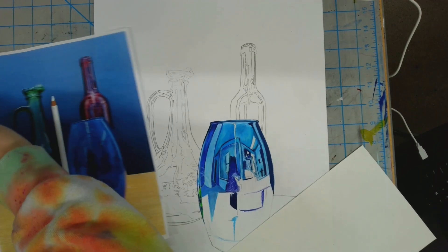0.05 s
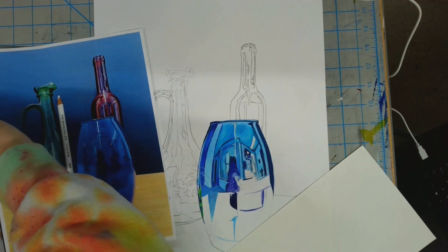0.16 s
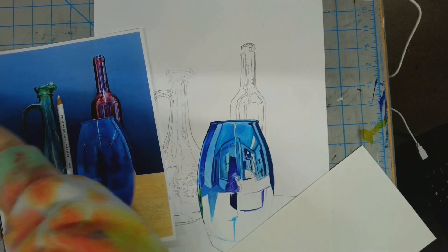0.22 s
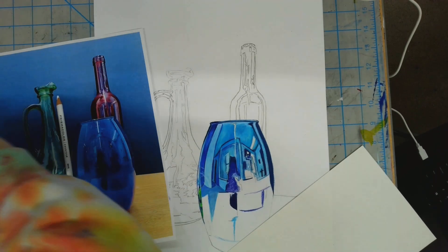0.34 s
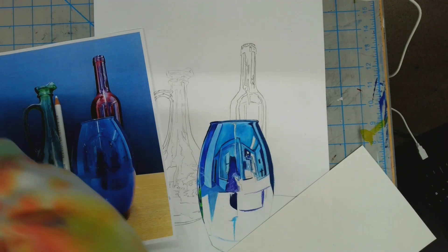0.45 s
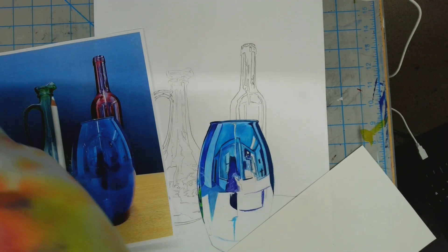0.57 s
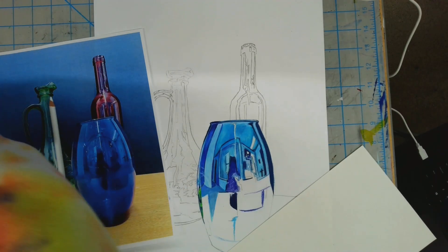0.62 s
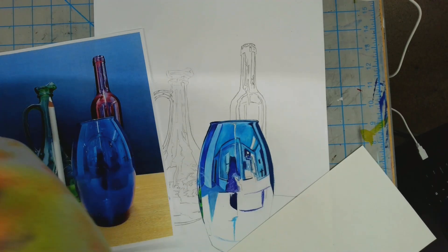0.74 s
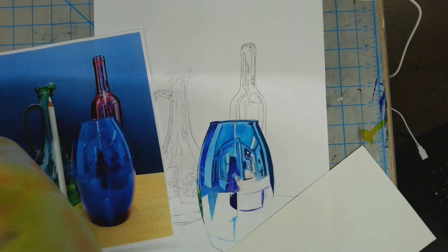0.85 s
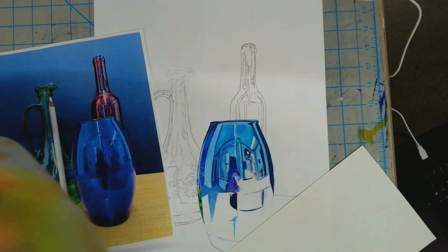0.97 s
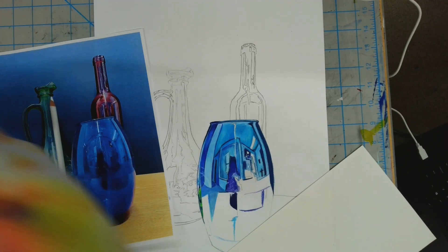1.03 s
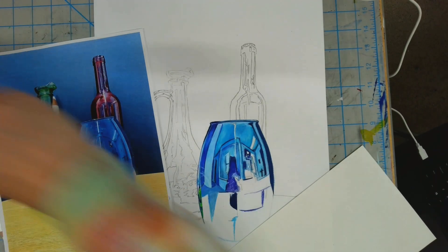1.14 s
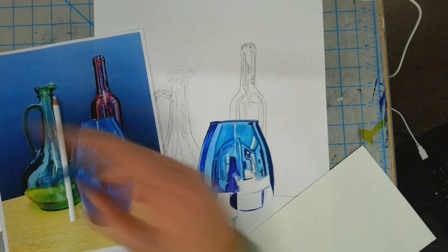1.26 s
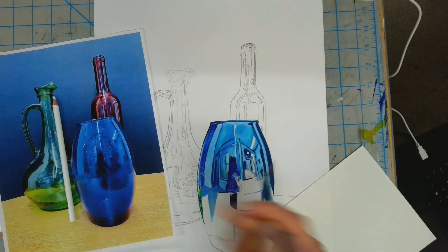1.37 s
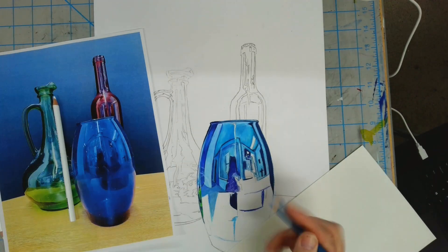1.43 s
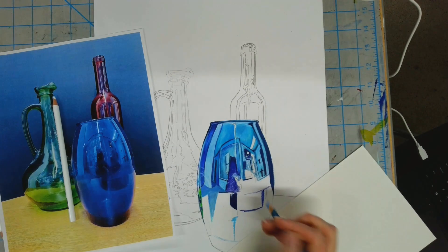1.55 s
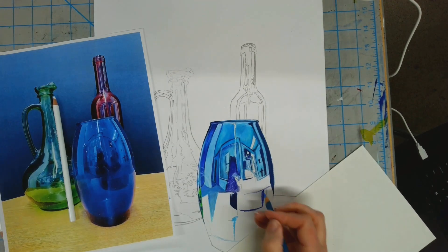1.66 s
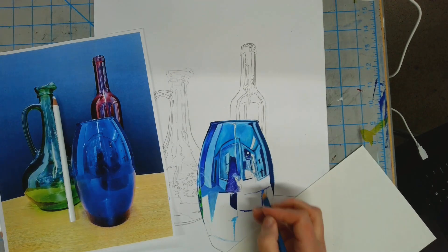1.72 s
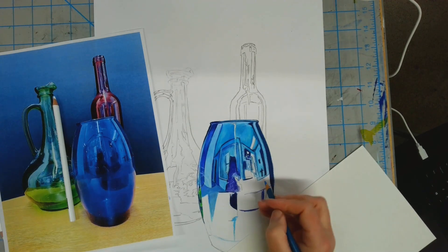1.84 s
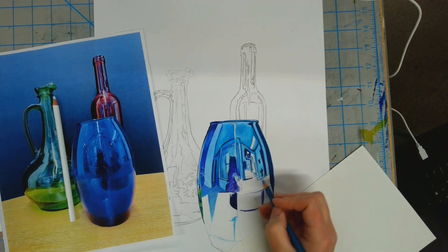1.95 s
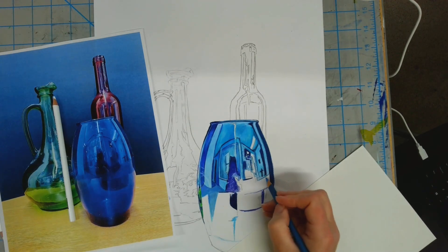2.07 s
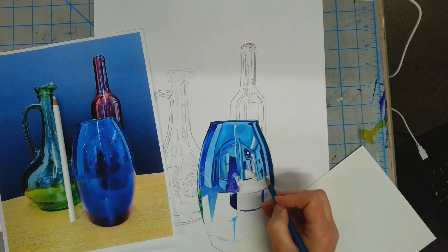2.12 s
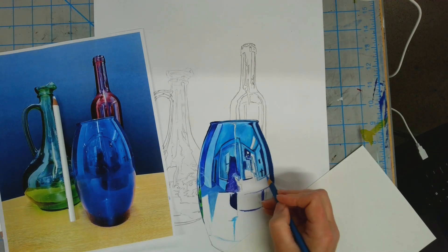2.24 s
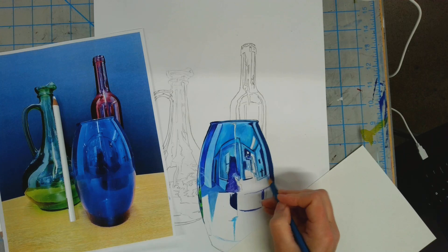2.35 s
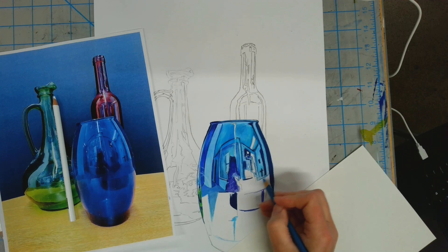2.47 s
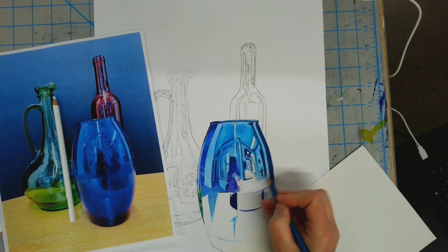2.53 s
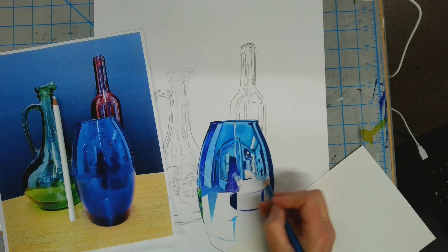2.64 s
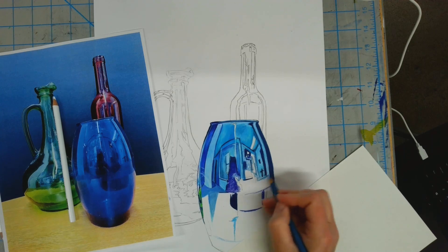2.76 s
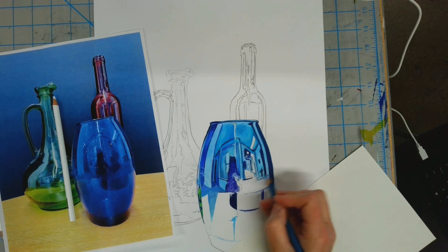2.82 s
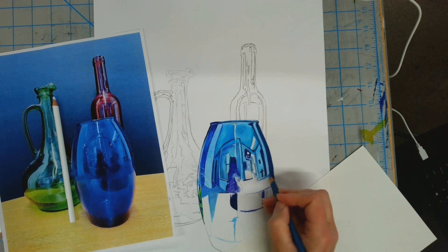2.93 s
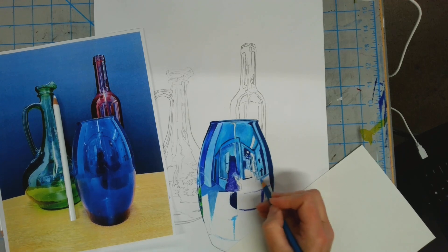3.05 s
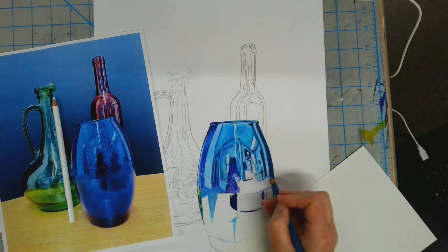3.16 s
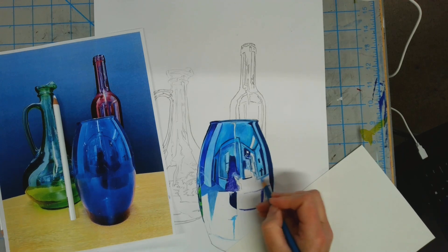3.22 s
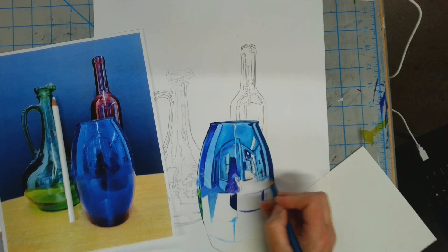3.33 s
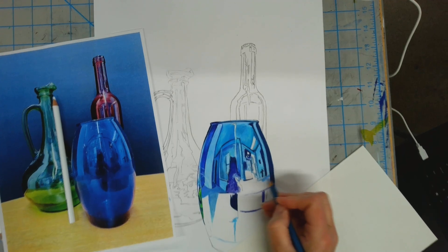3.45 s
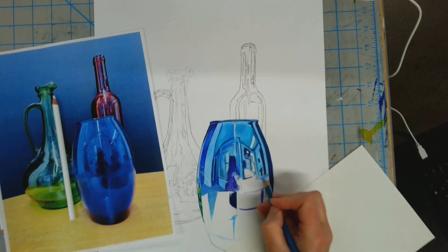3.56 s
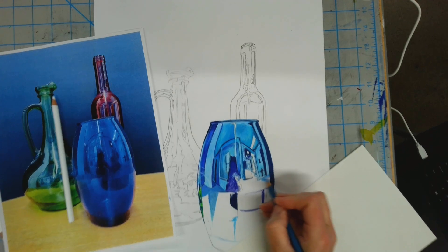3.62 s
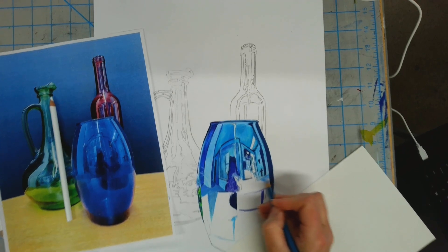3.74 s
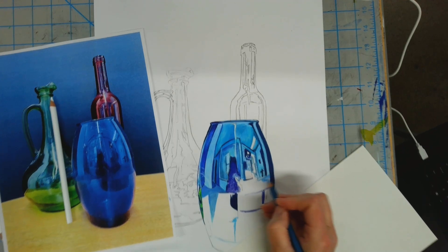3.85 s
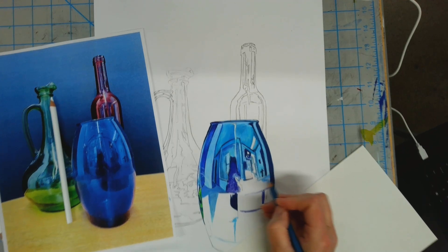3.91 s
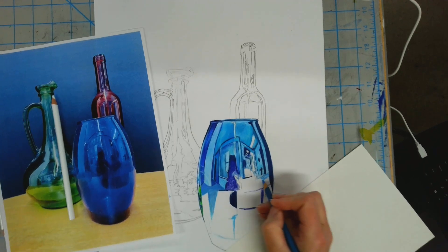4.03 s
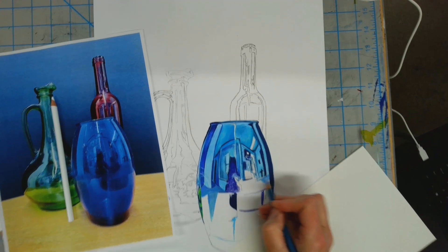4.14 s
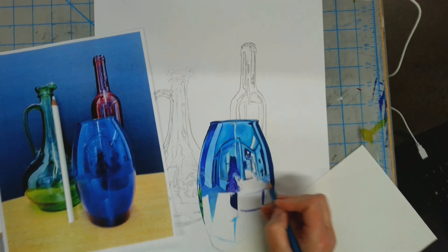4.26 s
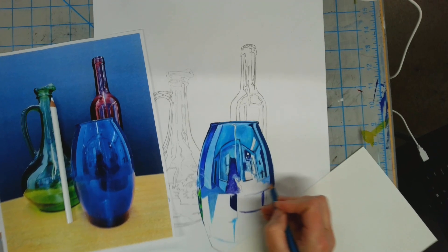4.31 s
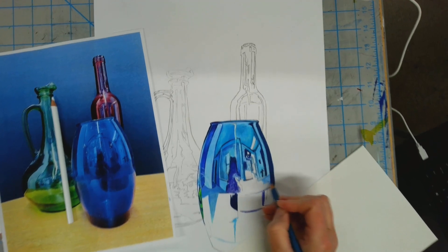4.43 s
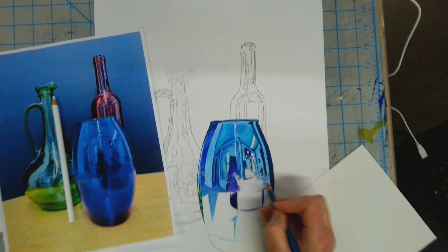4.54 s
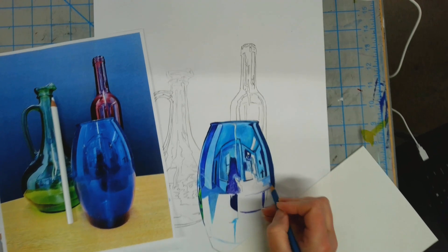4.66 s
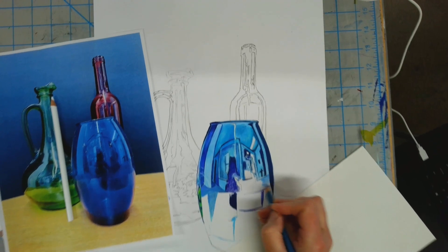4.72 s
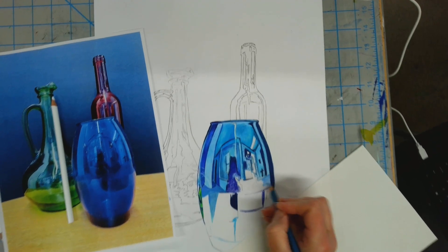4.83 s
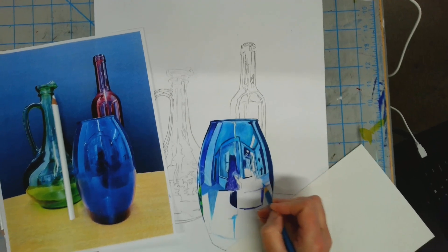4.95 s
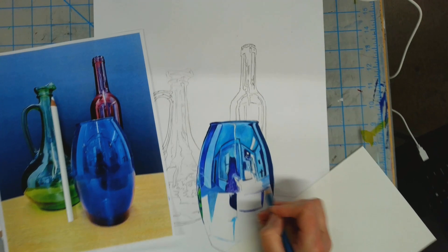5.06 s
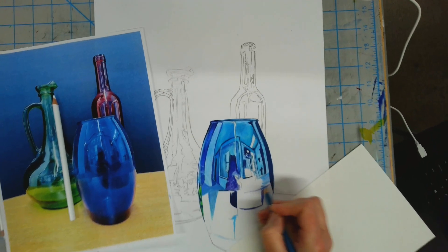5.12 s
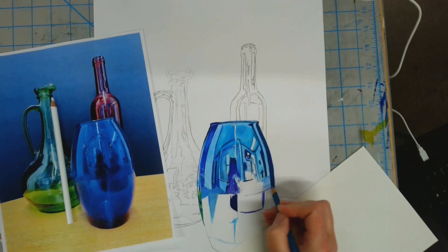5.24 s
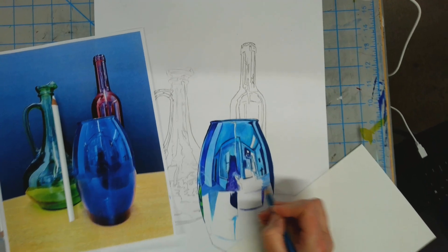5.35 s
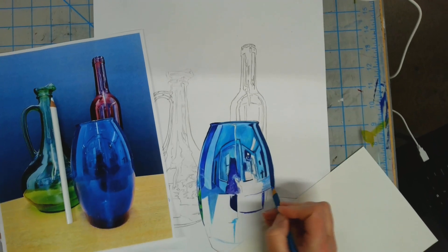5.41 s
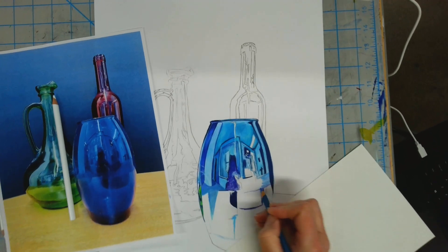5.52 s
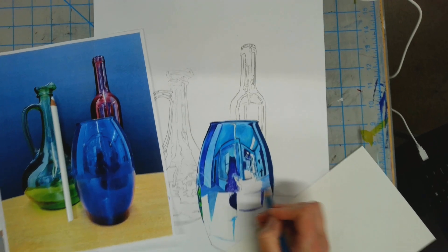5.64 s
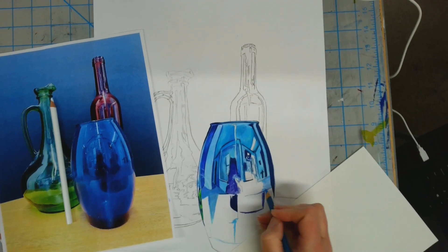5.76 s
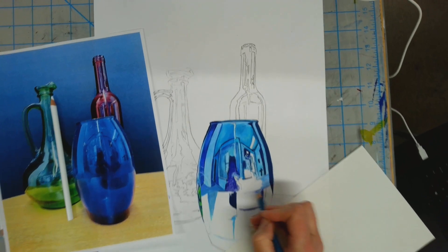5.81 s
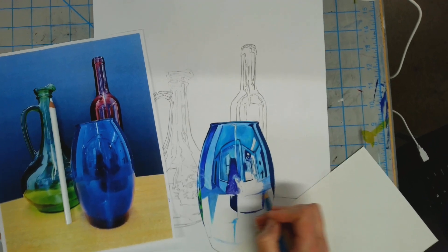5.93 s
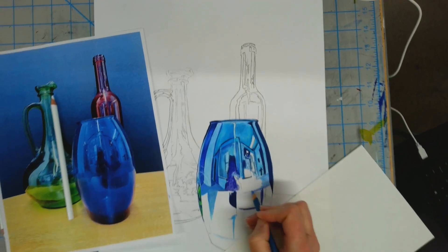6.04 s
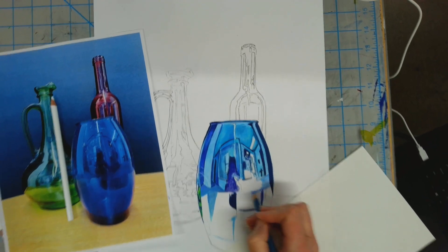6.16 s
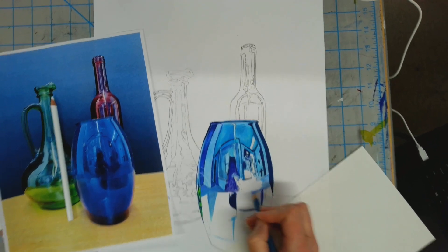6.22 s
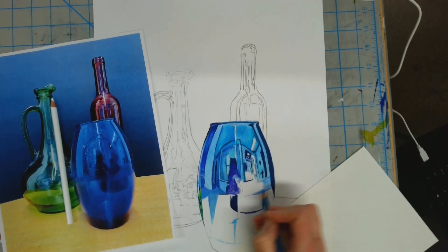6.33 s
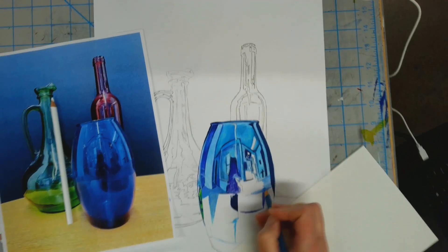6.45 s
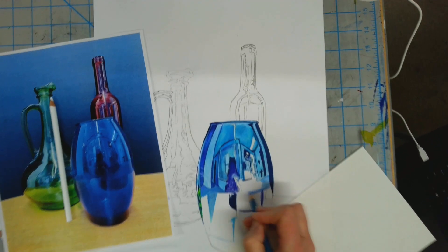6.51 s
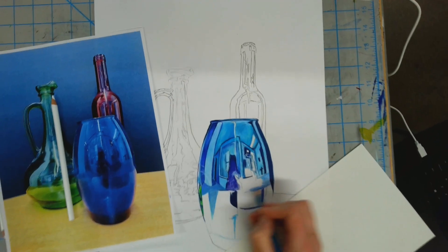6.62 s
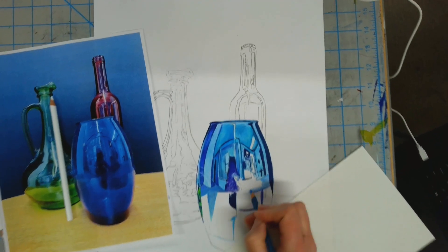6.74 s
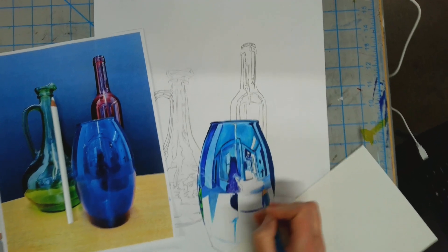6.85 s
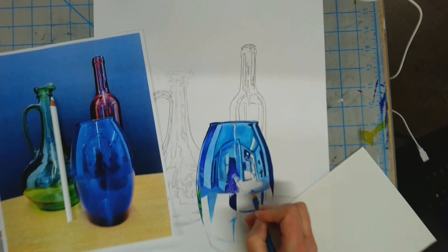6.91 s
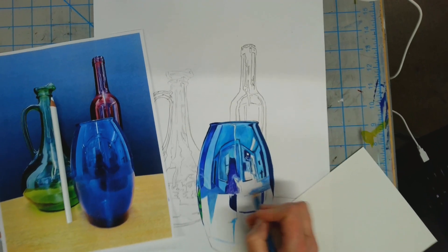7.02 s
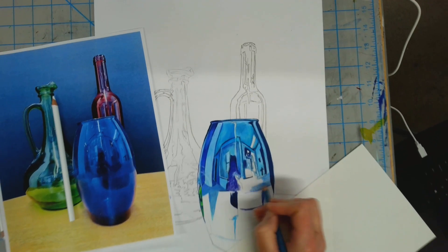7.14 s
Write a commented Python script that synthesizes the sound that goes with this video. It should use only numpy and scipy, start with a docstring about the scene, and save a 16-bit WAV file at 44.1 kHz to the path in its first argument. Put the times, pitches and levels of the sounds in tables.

```python
"""A sheet hisses across a desk, close to the microphone, and a pencil clicks down, rolls and rattles.
Sleeve and hand rub the paper, then a coloured pencil shades to and fro, about eleven strokes a second.
Friction is filtered trains of fibre slips; clicks are decaying modes and noise. The tip and the sheet
hiss most near 7 kHz, at the microphone's presence peak. The quiet room rumbles, echoes each contact
and, further off, lets through one faint knock."""
import sys
import numpy as np
from scipy import signal
from scipy.fft import rfft, irfft
from scipy.io import wavfile
from scipy.ndimage import uniform_filter1d

SR = 44100
rng = np.random.default_rng(int(sys.argv[2]) if len(sys.argv) > 2 else 0)


def wav_record(signal):
    """Record a signal, one row per channel, as 16-bit PCM in the file named by sys.argv[1]."""
    frames = np.transpose(np.atleast_2d(signal))
    bounded = np.clip(frames, -1, 1)
    # unit amplitude maps onto the largest positive 16-bit level
    quanta = np.round(bounded * 32767).astype(np.int16)
    wavfile.write(sys.argv[1], SR, quanta)


N = 316638
TIME = np.arange(N) / SR  # t/s

# Spectra of the place: columns [f/Hz, relative level/dB]
# low rumble, steady room air, thin microphone hiss
RUMBLE_SPECTRUM = [(20, -51), (40, -48.5), (60, -24), (90, -11.5), (125, -0.5), (160, 0.5), (183, 0.5),
                   (215, -2.5), (250, -6.5), (400, -19), (900, -51.5)]
AIR_SPECTRUM = [(60, -36.5), (200, -1.5), (330, 2), (500, -3.5), (700, -9.5), (880, -10.5), (1100, -17),
                (2000, -23), (4000, -28.5), (6000, -30.5), (10000, -52.5)]
MIC_HISS_SPECTRUM = [(2000, -9), (4500, -5.5), (6000, 5), (7000, 11.5), (7700, 2), (8500, 0), (9000, -0.5),
                     (10500, -57)]
# reverberant tail of the room, knock further off
REVERB_SPECTRUM = [(150, -28), (500, 12.5), (1200, 4.5), (3000, -1.5), (4500, -5.5), (7000, -7),
                   (10000, -4)]
FAR_KNOCK_SPECTRUM = [(400, -16), (1000, -5), (1700, -0.5), (2800, -2), (4000, -6), (6800, 1.5),
                      (9500, -18)]

# Spectra close to the microphone: columns [f/Hz, relative level/dB]
# sliding sheet, lower rasp of broad surfaces, pencil tip on paper
SHEET_SPECTRUM = [(300, -10.5), (1500, -27), (2500, -21.5), (3800, -16), (5200, -9), (5900, -7), (6900, 3),
                  (7400, 0), (8200, -9), (9200, -14), (10000, -24.5), (10800, -66)]
RASP_SPECTRUM = [(600, -5.5), (1300, -5.5), (2200, -5), (3000, 6), (3800, 6.5), (5000, 4), (6500, 2.5),
                 (10000, -32)]
TIP_SPECTRUM = [(1000, -34), (3000, -36), (4500, -18.5), (5500, -9), (6300, -6), (6900, 1), (7400, -1.5),
                (8300, -7), (9000, -17.5), (10000, -25), (10800, -58)]
# thud of the desk board, softness of wood meeting paper
THUD_SPECTRUM = [(200, -5), (450, -2.5), (750, -10.5), (1150, -1), (1550, -8), (2300, -3), (3500, -4.5),
                 (7000, -18)]
SOFT_CONTACT = [(30, -23), (200, -2.5), (500, -2), (7300, -1.5), (8500, -7), (9800, -7), (10800, -34)]

# Swells of the rumble: columns [middle t/s, length t/s, rise level/dB]
RUMBLE_SWELLS = [(.11, 0.15, 6), (0.658, 0.11, 6.5), (0.903, 0.16, 3.5), (1.218, .14, 5), (1.57, 0.13, 3),
                 (1.887, .2, 5.5), (5.663, 0.16, 3.5), (6.5, 0.27, 3.5), (6.96, 0.23, 6)]
# Slides of sheet, sleeve and hand:
# columns [fastest t/s, speeding up t/s, slowing down t/s, level/dB, rasp relative level/dB]
SLIDES = [(0.004, .05, .055, -40, -26), (.112, .13, 0.041, -39.5, -23), (.6, 0.45, 0.3, -59.5, -15),
          (1.12, 0.31, 0.39, -65.5, -11.5), (1.48, .25, 0.5, -68, -14), (1.7, .1, 0.085, -63, -5),
          (1.83, 0.14, 0.26, -52.5, -12), (2.02, .12, 0.07, -58, -10.5)]

# Pencil contacts: columns [t/s, level/dB, desk knock relative level/dB]
PENCIL_CONTACTS = [(0.2093, -44.5, -7.5), (0.444, -42.5, -2), (0.4729, -24.5, -20), (0.4769, -30, -9.5),
                   (0.5065, -30, -14), (0.5163, -13, -4), (0.533, -41, 4.5), (0.5462, -32, -7),
                   (0.5639, -29, -3.5), (0.642, -31, -26), (0.7313, -41, -21), (0.7978, -15.5, -15.5),
                   (0.8131, -22, -11), (1.07, -47, -16), (1.362, -51, -25)]
# Short rings as the pencil rocks and rolls: columns [t/s, f/Hz, level/dB, T60 t/s]
ROCKING_PINGS = [(0.5455, 3220, -31, 0.044), (.565, 3270, -40, 0.028), (0.6406, 7680, -22, 0.013),
                 (0.641, 4710, -40, 0.043), (0.732, 4790, -45, .028), (.7317, 7430, -36.5, 0.01),
                 (1.069, 7220, -37, 0.012)]
# Bending modes of the pencil, then modes of the desk: columns [f/Hz, relative level/dB, T60 t/s]
PENCIL_MODES = [(2950, -11, .008), (3800, -8, .008), (4280, -4, .008), (4660, -4, .008), (4980, -6, .008),
                (6030, -10, .008), (6620, -1, .009), (7050, 0, .008), (7380, -3, .008), (8000, -10, .007),
                (9300, -17, .005)]
DESK_MODES = [(380, -9, .035), (800, -11, .025), (1018, -7, .035), (1135, -3, .035), (1384, -5, .035),
              (1505, -2, .035), (1824, -3, .03), (2237, -4, .025), (2340, -6, .025), (2750, -3, .012),
              (3300, -4, .012), (3850, 1, .009)]

# Pace of the wrist: columns [t/s, stroke rate f/Hz]
STROKE_RATE = [(2.257, 12.05), (2.716, 10.68), (3.342, 10.96), (4.407, 10.59), (4.979, 11.11),
               (5.409, 9.78), (5.73, 11.185), (7.18, 10.99)]
# Pressure on the pencil: columns [t/s, relative level/dB]
PENCIL_PRESSURE = [(2.3, -63), (2.62, -55.5), (3.4, -53.5), (3.9, -55), (4.15, -53.5), (4.7, -54),
                   (5.1, -51.5), (5.7, -53.5), (6.0, -51.5), (6.42, -53.5), (6.72, -56.5), (7.0, -51.5),
                   (7.18, -54.5)]
# Rasp of the lead's broad side as the pencil is tilted: columns [t/s, relative level/dB]
SIDE_RASP = [(2.3, -15), (4.1, -14.5), (4.85, -16.5), (5.7, -10.5), (6.3, -11.5), (7.18, -13)]

RUMBLE_DB, RUMBLE_WAVER_DB = -52.5, 0.5
FAR_KNOCK_S = 4.402
WALL_ECHO_S = 0.0092  # delay of the nearest wall's echo
TOP_HZ = 10400  # upper limit of the recorder
SLIDE_CURVE = 1.34  # 1 = pointed swell, 2 = rounded
# the pencil rolls: start, build-up, stop, die-away and level of its rattle
ROLL_S, ROLL_ATTACK_S, ROLL_STOP_S, ROLL_T60_S, ROLL_DB = 0.473, 0.038, 0.65, 0.12, -55
SHADING_S = 2.257  # the tip touches the paper and the shading begins
# the return stroke is lighter and smoother; no two strokes are alike
RETURN_DB, RETURN_RASP_DB, STROKE_SCATTER_DB = -0.6, -3.5, 0.7
FORWARD_LEAN, RETURN_LEAN = 0.84, 0.94  # under 1: a stroke is fastest before its middle


def undb(db):
    """Decibels to gain."""
    return 10 ** (np.asarray(db) / 20)


def unit(x):
    """Scale to rms 1."""
    return x / np.sqrt(np.mean(x ** 2))


def curves(rows):
    """Join (t/s, value) rows by straight lines."""
    return np.interp(TIME, *np.transpose(rows))


def colour(x, points):
    """Filter by (f/Hz, level/dB) points joined along log frequency."""
    hz, db = np.transpose(points)
    bins = np.maximum(np.fft.rfftfreq(len(x), 1 / SR), 1)
    gain = undb(np.interp(np.log(bins), np.log(hz), db))
    return irfft(rfft(x) * gain, len(x))


def noise(points, size=N):
    """Coloured noise of rms 1."""
    return unit(colour(rng.standard_normal(size), points))


def walk(rate):
    """Smooth random wander of rms 1 with a new target rate times a second."""
    hold = max(int(SR / rate), 1)
    steps = np.repeat(rng.standard_normal(N // hold + 1), hold)
    return unit(uniform_filter1d(steps, hold)[:N])


def fade(t, t60):
    """Exponential decay, 60 dB down after t60."""
    return np.exp(-np.log(1000) * t / t60)


def add(out, s, sound):
    """Mix a sound in at time s."""
    start = max(int(s * SR), 0)
    out[start:start + len(sound)] += sound[:N - start]


def fibres(rate, spread_db):
    """Random tiny slips, rate a second; a positive spread makes a few strong, a negative one a few weak."""
    hit = rng.random(N) < rate / SR
    size = undb(spread_db * np.minimum(rng.exponential(size=N), 5))
    return hit * rng.standard_normal(N) * size


def ring(modes, t, detune, scatter_db):
    """One blow on a set of decaying modes; each blow weights and shifts them a little."""
    hz, db, t60 = np.transpose(modes)[:, :, None]
    shift, weight = rng.standard_normal((2, len(modes), 1))
    sign = (-1) ** np.arange(len(modes))[:, None]
    gain = undb(db + scatter_db * weight) * sign
    waves = np.sin(2 * np.pi * hz * (1 + detune * shift) * t) * fade(t, t60)
    return np.sum(gain * waves, axis=0) / np.sqrt(np.sum(gain ** 2))


def background(air_db=-60, hiss_db=-73):
    """A low rumble that swells and sinks, the steady air of the room and the microphone's thin hiss."""
    swell_db = sum(db * np.exp(-(2 * (TIME - s) / length) ** 2) for s, length, db in RUMBLE_SWELLS)
    rumble_db = RUMBLE_DB + swell_db + RUMBLE_WAVER_DB * walk(4.6)
    rumble = undb(rumble_db) * noise(RUMBLE_SPECTRUM)
    air = undb(air_db) * noise(AIR_SPECTRUM)
    hiss = undb(hiss_db) * noise(MIC_HISS_SPECTRUM)
    return rumble + air + hiss


def room(x, wall_db, early_db, late_db, early_t60=0.17, late_t60=0.65, gap_s=0.0037):
    """One distinct echo from the nearest wall, quick scattered reflections, then a longer tail."""
    t = TIME[:SR]
    response = np.zeros(SR)
    response[int(WALL_ECHO_S * SR)] = undb(wall_db)
    for db, t60 in (early_db, early_t60), (late_db, late_t60):
        build_up = np.clip(t / gap_s - 1, 0, 1)  # silent for gap_s, full after twice that
        tail = noise(REVERB_SPECTRUM, size=SR) * fade(t, t60) * build_up
        response = response + undb(db) * tail / np.linalg.norm(tail)
    return x + signal.fftconvolve(x, response)[:N]


def far_knock(db=-59, t60=1.0, onset_db=-1, onset_t60=0.16, rise_s=0.0053):
    """A faint knock further off: only its reverberation, as noise with a fast and a slow decay."""
    out, t = np.zeros(N), TIME[:SR]
    decay = fade(t, t60) + undb(onset_db) * fade(t, onset_t60)
    swell = 1 - np.exp(-t / rise_s)
    add(out, FAR_KNOCK_S, undb(db) * noise(FAR_KNOCK_SPECTRUM, size=SR) * decay * swell)
    return out


def rubbing(patchy_db=0.9):
    """Broad surfaces slide over paper: dense slips that catch unevenly; skin and cloth rasp lower."""
    hiss_power = rasp_power = 0
    for s, rise_s, fall_s, db, rasp_db in SLIDES:
        # a slide is 20 dB down where it starts and where it ends
        away = np.maximum((s - TIME) / rise_s, (TIME - s) / fall_s)
        swell = undb(db - 20 * away ** SLIDE_CURVE)
        hiss_power = hiss_power + swell ** 2
        rasp_power = rasp_power + (undb(rasp_db) * swell) ** 2
    hiss = unit(colour(fibres(12000, spread_db=-0.5), SHEET_SPECTRUM))
    rasp = unit(colour(fibres(12000, spread_db=-0.5), RASP_SPECTRUM))
    friction = hiss * np.sqrt(hiss_power) + rasp * np.sqrt(rasp_power)
    return friction * undb(patchy_db * walk(99))


def pencil_click(t, db, knock_db, crack_db=-11, crack_t60=0.015, thud_db=-7, thud_t60=0.079):
    """A contact cracks, rings the pencil's bending modes and knocks the desk."""
    wood = ring(PENCIL_MODES, t, detune=0.006, scatter_db=1.2)
    # the board's many weak modes merge into a noisy thud
    thud = undb(thud_db) * noise(THUD_SPECTRUM, size=len(t)) * fade(t, thud_t60)
    desk = undb(-5) * (ring(DESK_MODES, t, detune=0.0075, scatter_db=3.5) + thud)
    crack = undb(crack_db) * noise(SHEET_SPECTRUM, size=len(t)) * fade(t, crack_t60)
    return undb(db) * (wood + undb(knock_db) * desk + crack)


def rocking_ping(t, hz, db, t60, flutter=0.32):
    """A short decaying tone that swells within a moment and chatters against the paper."""
    chatter = (1 - fade(t, 0.0025)) * (1 + flutter * walk(440)[:len(t)])
    return undb(db) * chatter * np.sin(2 * np.pi * hz * t) * fade(t, t60)


def rolling_rattle(rattle_rate=500):
    """The rolling pencil rattles as a train of random bumps, rattle_rate a second."""
    bumps = fibres(rattle_rate, spread_db=1.5)
    build_up = np.clip((TIME - ROLL_S) / ROLL_ATTACK_S, 0, 1)
    die_away = fade(np.maximum(TIME - ROLL_STOP_S, 0), ROLL_T60_S)
    rattle = unit(colour(colour(bumps, RASP_SPECTRUM), SHEET_SPECTRUM))
    return undb(ROLL_DB) * build_up * die_away * rattle


def pencil_set_down():
    """The pencil clicks on the desk, rocks with short pings and rolls with a rattle."""
    out, t = np.zeros(N), TIME[:SR // 5]
    for s, db, knock_db in PENCIL_CONTACTS:
        add(out, s, pencil_click(t, db, knock_db))
    for s, hz, db, t60 in ROCKING_PINGS:
        add(out, s, rocking_ping(t, hz, db, t60))
    # wood on paper is a soft contact: little of the highest treble
    return colour(out + rolling_rattle(), SOFT_CONTACT)


def shading(bite=0.97, flat=1.484, turn_db=-22, patchy_db=0.78, tip_db=-5.0, rasp_db=-3, tilt=0.0095):
    """The tip speeds up, glides and slows to each turn; its speed sets how many fibres it plucks."""
    drawing = TIME > SHADING_S
    place = np.cumsum(curves(STROKE_RATE) * drawing) / SR  # strokes made so far
    stroke = place.astype(int)
    returning = stroke % 2
    lean = np.where(returning, RETURN_LEAN, FORWARD_LEAN)
    speed = np.abs(np.sin(np.pi * (place % 1) ** lean))

    # a little grip remains at the turns
    grip = np.tanh((flat * speed) ** (2 * bite)) + undb(turn_db) * drawing
    stroke_db = RETURN_DB * returning + STROKE_SCATTER_DB * rng.standard_normal(N)[stroke]
    force = grip * undb(curves(PENCIL_PRESSURE) + stroke_db + patchy_db * walk(110))

    # the return stroke rides more on the point and hisses a little higher
    slips = fibres(5000 + 9000 * speed, spread_db=-2.0)
    push = unit(colour(slips, [(hz * (1 - tilt), db) for hz, db in TIP_SPECTRUM]))
    pull = unit(colour(slips, [(hz * (1 + tilt), db) for hz, db in TIP_SPECTRUM]))
    tip = undb(tip_db) * np.where(returning, pull, push)

    side_db = curves(SIDE_RASP) + RETURN_RASP_DB * returning
    side_slips = fibres(4000 + 6000 * speed, spread_db=0.0)
    rasp = undb(rasp_db + side_db) * unit(colour(side_slips, RASP_SPECTRUM))
    return force * (tip + rasp)


def scene():
    """One microphone feeds both channels; the clicks excite more of the room than the friction."""
    friction = room(rubbing() + shading(), wall_db=-16.0, early_db=-17.5, late_db=-20.5)
    clicks = room(pencil_set_down(), wall_db=-13.5, early_db=-13.0, late_db=-13.5,
                  early_t60=0.22, late_t60=1.0)
    mono = background() + far_knock() + clicks + friction
    return np.array([mono, mono])


def record(dry):
    """The recorder cuts the top steeply, with an elliptic low-pass."""
    return signal.sosfilt(signal.ellip(8, 0.2, 70, TOP_HZ, fs=SR, output="sos"), dry)


dry = scene()
out = record(dry)
wav_record(out)
```